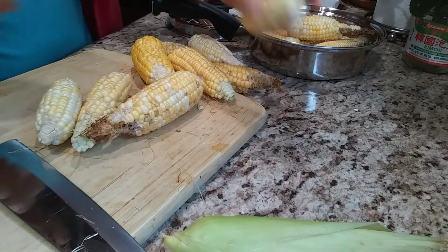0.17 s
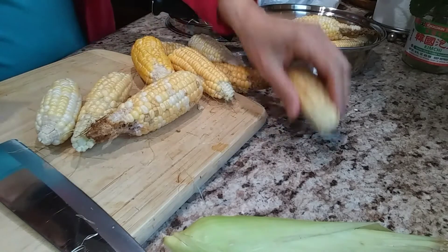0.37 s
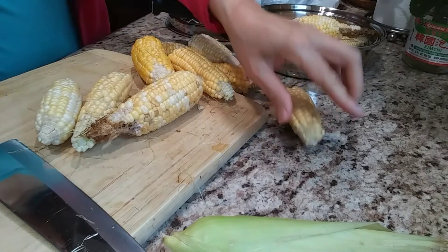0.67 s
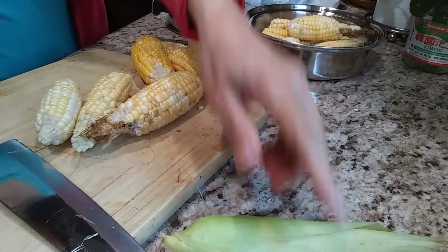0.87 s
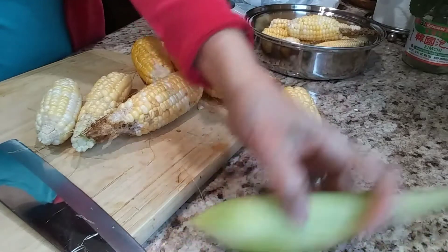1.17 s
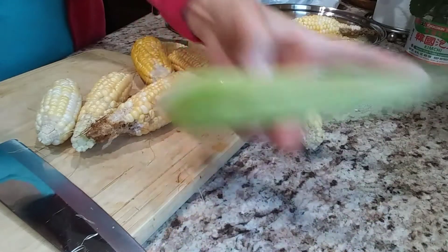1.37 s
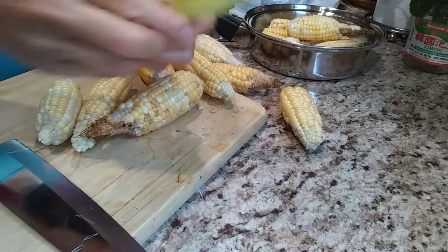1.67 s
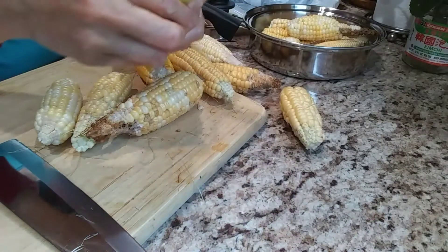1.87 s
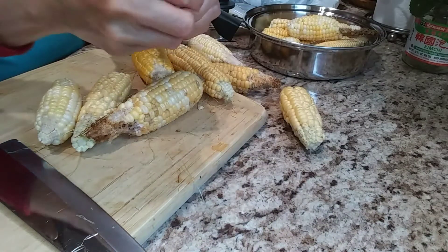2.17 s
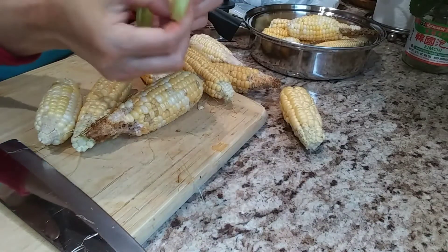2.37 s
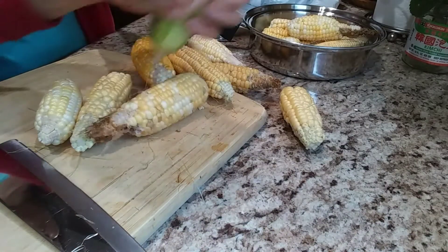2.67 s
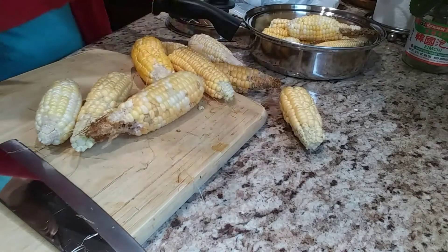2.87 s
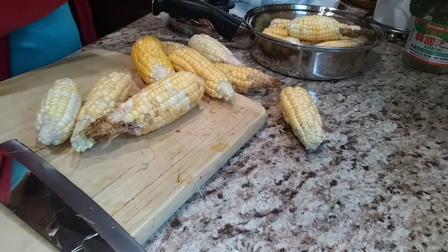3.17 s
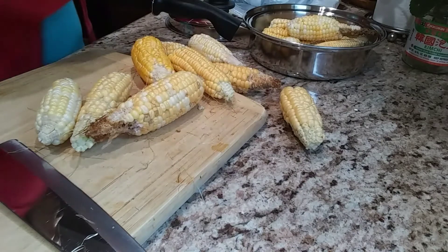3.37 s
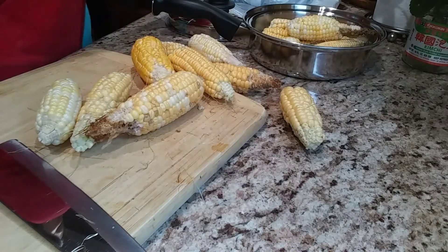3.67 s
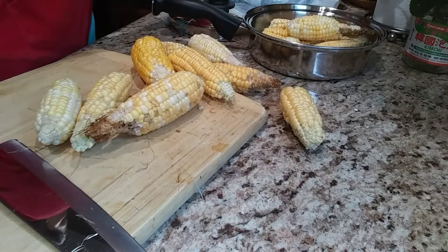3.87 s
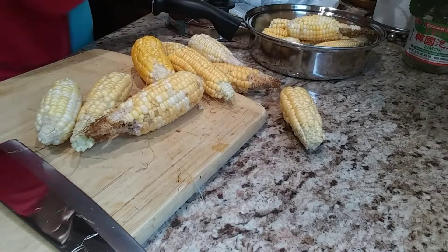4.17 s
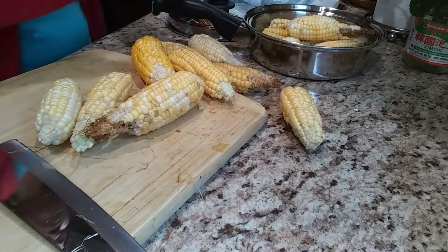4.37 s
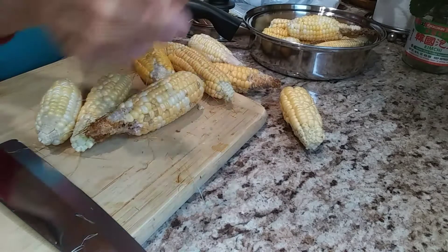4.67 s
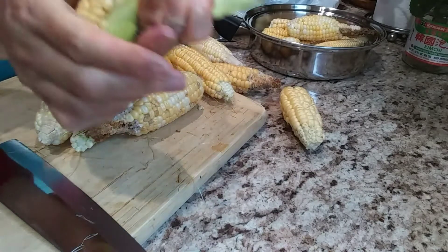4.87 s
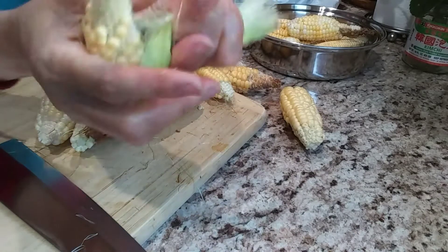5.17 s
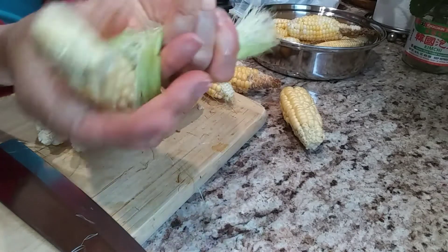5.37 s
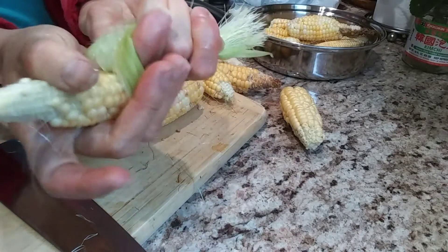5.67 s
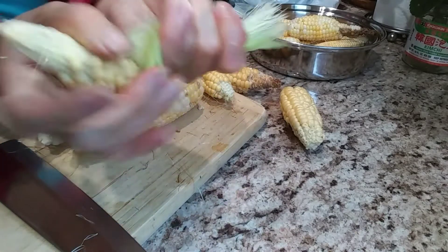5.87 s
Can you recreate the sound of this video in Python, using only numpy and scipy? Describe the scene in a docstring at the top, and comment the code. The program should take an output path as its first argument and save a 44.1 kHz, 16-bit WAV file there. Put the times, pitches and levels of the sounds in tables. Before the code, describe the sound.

An ear of fresh corn is husked by hand, close up, in a hard-walled kitchen. A small snap and a faint steel clink come first, then fingers rub over the leaves and little strips rip. The husk is torn down in swelling pulls, with crackling fibres and sharp snaps. After a lull, more pulls follow and the damp leaves creak against each other. A low rush of air lies underneath.

```python
"""An ear of fresh corn is husked by hand in a hard-walled kitchen, over a low rush of air.
First the ear is picked off a stone counter with a small snap and a faint clink of steel. From about
one second the hand rubs the leaves and small strips rip. From two seconds the leaves are torn down in
long pulls: fibres crackle and ribs snap. Around five seconds, during the last pulls, the damp leaves
creak as they stick and slip over each other."""
import sys
import numpy as np
from scipy import signal
from scipy.fft import rfft, irfft, next_fast_len
from scipy.io import wavfile
from scipy.ndimage import uniform_filter1d

SR = 44100
rng = np.random.default_rng(int(sys.argv[2]) if len(sys.argv) > 2 else 0)


def wav_out(sig):
    """Save sig, one row per channel (or a flat mono array), as 16-bit PCM at SR to the path in sys.argv[1]."""
    wavfile.write(sys.argv[1], SR, np.round(np.clip(np.atleast_2d(sig).T, -1, 1) * 32767).astype(np.int16))


N = 265305

# The tone of the hollow husk and of its bright fibres. Each row: frequency in Hz, level in dB.
HUSK_TONE = [(100, -41), (200, -28), (400, -10.5), (750, -4), (1100, -3), (1900, 1.5), (2900, 1.5),
             (4300, 3), (5600, -9), (8000, -12), (16000, -43)]
FIBRE_TONE = [(1500, -82.5), (4000, -11.5), (5500, -7.5), (7200, 3), (10000, 1), (12500, -4.5),
              (16000, -9.5)]
# Pulls on the husk, building until the leaf gives.
# Each row: start in seconds, length in seconds, final level in dB, swell in dB, brightness in dB.
HUSK_PULLS = [(1.92, 0.033, -52.5, 11, -0.5), (2.0, 0.26, -65, 12, 2), (2.12, .07, -56, 2, 0.5),
              (2.195, 0.13, -39, 11.5, 1.5), (2.38, .13, -54.5, 22.5, -0.5), (2.625, 0.28, -42, 11, 1),
              (2.935, 0.14, -33, 6, 2.5), (3.1, 0.15, -57, -2.5, -12), (3.35, 0.4, -64.5, 11, -1.5),
              (4.1, 0.285, -52, 22.5, -3), (4.5, 0.32, -50, 18, -4.5), (4.865, 0.034, -41.5, 5, -2),
              (5.0, .17, -35, 30, -3.5), (5.245, 0.082, -44, 0.5, 1.5), (5.34, 0.059, -32, 7, -13.5),
              (5.53, 0.14, -45, 0.5, -5), (5.78, .16, -68, 5, -6)]


def amp(db):
    """Turn decibels into a gain."""
    return 10 ** (np.asarray(db) / 20)


def unit(x):
    """Scale a sound to an average (rms) level of 1."""
    return x / np.sqrt(np.mean(x ** 2) + 1e-20)


def along(points, hz):
    """Read between (Hz, value) points, with every octave equally wide."""
    frequencies, values = np.transpose(points)
    return np.interp(np.log(hz + 1), np.log(frequencies), values)


def add(track, start, sound):
    """Mix a sound into a track at a start time in seconds."""
    part = track[max(0, round(start * SR)):][:len(sound)]
    part += sound[:len(part)]


def filtered(x, gain):
    """Turn each frequency up or down by gain(hz)."""
    size = next_fast_len(N + SR // 4)
    return irfft(rfft(x, size) * gain(np.fft.rfftfreq(size, 1 / SR)), size)[..., :N]


def body(x, tone, size=4096):
    """Let a sound ring through an object with this tone."""
    cepstrum = irfft(np.log(amp(along(tone, np.fft.rfftfreq(size, 1 / SR)))))
    # fold it so that the ringing comes after each hit, never before
    cepstrum[1:size // 2] *= 2
    cepstrum[size // 2 + 1:] = 0
    response = irfft(np.exp(rfft(cepstrum)))
    return signal.fftconvolve(x, response / np.linalg.norm(response))[:N]


def grains(per_s, spread_db, life_s, hiss):
    """A crackle: tiny noise bursts of uneven size at random moments, over a smooth hiss."""
    hits = rng.random(N) < per_s / SR
    energy = hits * amp(spread_db * np.clip(rng.standard_normal(N), -2, 2)) ** 2
    energy = signal.lfilter([1], [1, -np.exp(-1 / (life_s * SR))], energy)
    # the hand sets the work done per moment, however many fibres share it
    energy /= np.abs(uniform_filter1d(energy, size=1100)) + energy.mean() / 20
    return unit(np.sqrt(energy + hiss) * rng.standard_normal(N))


def strokes(rows, attack_s=0.014, release_db_per_s=244.5):
    """How strong hand strokes and their treble are over time: each takes hold, swells and lets go."""
    gain, treble = np.zeros((2, N))
    for start, length, db, swell_db, bright_db in rows:
        t = np.arange(N) / SR - start
        rise_db = swell_db * (np.clip(t / length, 0, 1) - 1)
        fall_db = release_db_per_s * np.maximum(t - length, 0)
        stroke = np.clip(t / attack_s, 0, 1) * amp(db + rise_db - fall_db)
        gain += stroke
        treble += amp(bright_db) * stroke
    return gain, treble


def leaf_ring(t, hz, cycles):
    """A flicked leaf swings a few times; its speed makes the sound."""
    swing = np.sin(2 * np.pi * hz * t) * np.exp(-t * hz / cycles) * (1 - np.exp(-2 * t * hz))
    speed = np.gradient(swing)
    return speed / np.abs(speed).max()


def room_noise(level_db=-59):
    """A steady low rush of air in the room."""
    # The tone of the air. Each row: frequency in Hz, level in dB.
    air_tone = [(15, -70), (25, -37.5), (92, -33.5), (149, -10.5), (263, -9.5), (326, -3.5), (489, -8),
                (575, -4.5), (1070, -9), (1330, -13), (1440, -14), (2480, -20), (7920, -34), (14800, -29),
                (16000, -49)]
    air = filtered(rng.standard_normal(N), lambda hz: amp(along(air_tone, hz)))
    return amp(level_db) * unit(air)


def steel_clink(bright_db=-2, ring_db=3, life_s=0.075):
    """Lightly touched steel rings briefly in a wash of room sound."""
    # Touches on kitchenware. Each row: start in seconds, level in dB.
    touches = [(0.084, -54.5)]
    # The notes of the steel. Each row: frequency in Hz, level in dB.
    steel_notes = [(3130, -11), (3850, -14), (4450, -11), (6830, -14), (7740, -16)]
    t = np.arange(SR // 2) / SR
    chord = sum(amp(db) * np.sin(2 * np.pi * hz * t) for hz, db in steel_notes)
    wash, rings = np.zeros((2, N))
    for start, db in touches:
        fade = amp(db - 7) * np.exp(-t / life_s)
        add(wash, start, fade * rng.standard_normal(len(t)))
        add(rings, start, fade * chord)
    return body(wash, HUSK_TONE) + amp(bright_db) * body(wash, FIBRE_TONE) + amp(ring_db) * rings


def rib_snaps(cycles=2.15, crack_s=0.0006, splinter_s=0.0064, fizz_db=-4):
    """Each leaf rib cracks, rings for a few swings and sheds splinters."""
    # Ribs breaking. Each row: start in seconds, level in dB, pitch in Hz,
    # then the dB added to that level for the crack and for the splinters.
    ribs = [(.084, -40.5, 4000, -3, -26), (.597, -44, 3750, -3, -23), (.987, -37, 3220, 8.5, -7),
            (1.061, -31, 2500, -20, -22), (1.346, -29, 6400, 5, -16), (1.635, -31.5, 1690, 9, -13),
            (1.952, -26.5, 2120, -1.5, -14), (2.045, -34, 10300, -1, -32), (2.121, -29, 4100, -9, -8),
            (2.216, -26, 6800, -9, -16), (2.239, -22, 7030, 0, -34), (2.245, -15, 6960, -2, -27.5),
            (2.274, -13, 6800, -9, -28), (2.3094, -14, 3840, -4.5, -14.5), (2.3265, -19, 4000, -9, -16),
            (2.774, -12, 2560, -7.5, -32.5), (2.842, -14.5, 10200, -3.5, -21.5),
            (3.0105, -10, 5000, 0, -27), (3.0294, -9.5, 2840, -10.5, -24), (3.0461, -5, 4460, -20, -37.5),
            (3.0961, -7, 7270, 0.5, -24.5), (4.223, -33.5, 7250, -7, -23), (4.314, -27.5, 2740, 4, -12),
            (4.36, -24.5, 2200, -12, -17), (4.3726, -20.5, 1870, -8.5, -22), (4.561, -27.5, 3320, 0, -16.5),
            (4.695, -27, 4640, 0.5, -12), (4.742, -19.5, 1790, -5.5, -12.5), (4.81, -27.5, 3770, -4, -22),
            (4.8833, -19.5, 2060, 2.5, -20.5), (4.906, -18, 3200, 3, -22), (5.048, -28.5, 3600, -13, -30),
            (5.072, -24.5, 3520, -4, -19.5), (5.114, -24, 3200, -4.5, -13), (5.1465, -8.5, 4080, -8, -17.5),
            (5.248, -18.5, 3700, -12, -19.5), (5.292, -14.5, 10600, -4.5, -24),
            (5.3684, -8.5, 4470, -0.5, -22.5), (5.5744, -17, 1970, 3.5, -31), (5.6667, -24, 4400, -8, -19),
            (5.711, -26, 3940, -12, -17.5), (5.879, -29.5, 3340, -8, -13.5), (5.94, -27, 4870, -4.5, -16)]
    t = np.arange(SR // 40) / SR
    rings, cracks, splinters = np.zeros((3, N))
    for start, db, hz, crack_db, splinter_db in ribs + thin_ribs():
        crack = rng.choice([-1, 1], len(t)) * np.exp(-t / crack_s)
        splinter = rng.standard_normal(len(t)) * np.exp(-t / splinter_s)
        add(rings, start, amp(db - 5.5) * leaf_ring(t, hz, cycles))
        add(cracks, start, amp(db + crack_db + 4.5) * crack / np.linalg.norm(crack))
        add(splinters, start, amp(db + splinter_db) * splinter)
    return rings + body(cracks + amp(fizz_db) * splinters, FIBRE_TONE) + body(splinters, HUSK_TONE)


def hand_rubbing(grip_db=-53.5, firm_pull_db=-41):
    """Skin slides over ribbed leaves; the harder the hands work, the more the cob shifts dully."""
    # The hand sliding on the ear.
    # Each row: start in seconds, length in seconds, final level in dB, swell in dB, brightness in dB.
    rubs = [(.92, 0.3, -48.5, 8.5, -2.5), (1.25, 0.12, -54.5, 3.5, 3), (1.51, 0.091, -50.5, 5, -1.5),
            (1.67, 0.16, -68, 1, 3.5)]
    # The tone of the palm and of the cob. Each row: frequency in Hz, level in dB.
    palm_tone = [(100, -19), (300, -17), (600, -5.5), (1100, 1.5), (2000, 2.5), (3500, 3), (5300, -4),
                 (8000, -2), (16000, -37)]
    cob_tone = [(40, -38), (100, -24.5), (160, -11.5), (320, 0.5), (650, -2.5), (1000, -8), (2000, -32.5)]
    rub, treble = strokes(rubs)
    pull, _ = strokes(HUSK_PULLS)
    slide = grains(per_s=3300, spread_db=10.5, life_s=0.00067, hiss=0.92)
    effort = (rub + pull) / amp(firm_pull_db)
    shift = amp(grip_db) * np.sqrt(effort) * grains(per_s=100, spread_db=7.5, life_s=0.0017, hiss=0.76)
    return body(rub * slide, palm_tone) + body(treble * slide, FIBRE_TONE) + body(shift, cob_tone)


def leaf_rips(husk_db=-3, ring_db=-4, fizz_db=1, sharpness=8):
    """A run of fibres parts in one dense burst that swells and stops, ringing the freed strip."""
    # Strips of leaf giving way at once.
    # Each row: start in seconds, length in seconds, level in dB, brightness in dB, pitch in Hz.
    strips = [(.955, .01, -44.5, -9, 3900), (1.51, 0.01, -50.5, -0.5, 2100), (1.56, 0.011, -51.5, 2, 2980),
              (1.631, .008, -44, -5, 4960), (1.949, .008, -41.5, -9, 1410), (2.258, 0.015, -35, 1.5, 4540),
              (2.3, 0.018, -29.5, -9, 3700), (2.766, 0.017, -35.5, -16, 2350),
              (2.945, 0.033, -31.5, -19, 2600), (2.99, 0.037, -33, -2, 3800), (3.025, 0.032, -34, 5.5, 687),
              (3.707, .014, -53, -5.5, 1560), (5.129, 0.03, -22.5, -13, 2060),
              (5.131, 0.024, -29.5, -10, 1030), (5.532, 0.0064, -35.5, 6.5, 4380),
              (5.662, 0.0093, -42, 8.5, 4400)]
    t = np.arange(SR // 20) / SR
    bursts, fizz, rings = np.zeros((3, N))
    breaks = grains(per_s=900, spread_db=3.5, life_s=0.00055, hiss=0.95)
    for k, (start, length, db, bright_db, hz) in enumerate(strips):
        swell = np.sqrt(np.abs(np.sin(np.pi * np.minimum(t / length, 1))))
        burst = amp(db) * swell * breaks[k * len(t):][:len(t)]
        ring = signal.lfilter(*signal.iirpeak(hz, sharpness, SR), burst)
        add(bursts, start, burst)
        add(fizz, start, amp(bright_db) * burst)
        add(rings, start, ring * np.linalg.norm(burst) / np.linalg.norm(ring))
    husk = amp(husk_db) * body(bursts, HUSK_TONE)
    return husk + amp(ring_db) * rings + amp(fizz_db) * body(fizz, FIBRE_TONE)


def husk_tearing():
    """Breaking fibres shake the hollow husk and give off a bright fizz of their own."""
    pull, treble = strokes(HUSK_PULLS)
    fibres = grains(per_s=560, spread_db=3.6, life_s=0.0006, hiss=0.26)
    return body(pull * fibres, HUSK_TONE) + body(treble * fibres, FIBRE_TONE)


def thin_ribs(per_s=35, over_pull_db=13, scatter_db=3.5, hz=3780, crack_db=3.5, splinter_db=-10):
    """More rows for rib_snaps: thin ribs break at random, louder when the pull is stronger."""
    pull, _ = strokes(HUSK_PULLS)
    starts = np.cumsum(rng.exponential(1, 400)) / per_s
    chance = np.clip(rng.standard_normal((len(starts), 2)), -2, 2)
    rows = []
    for start, (size, pitch) in zip(starts, chance):
        if start < N / SR:
            db = 20 * np.log10(pull[int(start * SR)] + 1e-9) + over_pull_db + scatter_db * size
            rows.append((start, db, hz * np.exp(0.49 * pitch), crack_db, splinter_db))
    return rows


def slips(slide, jitter=0.12, scatter_db=0.1):
    """The time, size and pitch of each slip in a creak: they weaken and rise as the leaf slides off."""
    start, length, db, fade_db, per_s, first_hz, last_hz = slide
    timing, level, pitch = rng.standard_normal((128, 3))[:int(length * per_s)].T
    progress = (np.arange(len(timing)) + jitter * timing) / (length * per_s)
    size = amp(db - fade_db * progress + scatter_db * level) * np.sqrt(SR / per_s)
    hz = (first_hz + (last_hz - first_hz) * progress) * np.exp(jitter * pitch)
    return zip(start + length * progress, size, hz)


def leaf_creaks(flick_db=-5, scrape_db=-5, scrape_s=0.0022, ring_db=-3):
    """Damp leaves stick and slip: each slip flicks the leaf, and its short scrape rings the tight husk."""
    # Leaf sliding on leaf. Each row: start in seconds, length in seconds, first level in dB,
    # fade in dB, slips per second, first pitch in Hz, last pitch in Hz.
    slides = [(4.883, 0.055, -36.5, 3.9, 200.4, 2600, 2950), (5.374, 0.21, -29, 12.3, 204.5, 2500, 4830),
              (5.566, .06, -29.5, 2.2, 220.1, 3230, 3630)]
    # The tone of a scraped leaf. Each row: frequency in Hz, level in dB.
    leaf_tone = [(150, -36), (500, -20.5), (1000, -14), (1500, -4), (2200, -0.5), (2900, 1), (3550, 2.5),
                 (4400, -3), (5500, -9), (7000, -3.5), (9000, -15), (11000, -6), (13000, -26),
                 (16000, -18.5)]
    # The notes of the tight leaf round the cob. Each row: frequency in Hz, width in Hz, level in dB.
    leaf_notes = [(2310, 210, -20), (3540, 70, -7), (4210, 116, -8), (4670, 93, -11), (6370, 700, -12.5)]
    t = np.arange(SR // 100) / SR
    flicks, scrapes = np.zeros((2, N))
    for slide in slides:
        for start, size, hz in slips(slide):
            flick = leaf_ring(t, hz, cycles=2)
            scrape = rng.choice([-1, 1], len(t)) * np.exp(-t / scrape_s)
            add(flicks, start, size * flick / np.linalg.norm(flick))
            add(scrapes, start, size * scrape / np.linalg.norm(scrape))
    chord = np.zeros(len(t))
    for hz, width, db in leaf_notes:
        fade = np.sqrt(4 * np.pi * width / SR) * np.exp(-np.pi * width * t)
        chord += amp(db) * fade * np.cos(2 * np.pi * hz * t)
    chord[0] /= 2  # half a step at the start keeps the ring free of bass
    rings = signal.fftconvolve(scrapes, chord)[:N]
    return amp(flick_db) * flicks + amp(scrape_db) * body(scrapes, leaf_tone) + amp(ring_db) * rings


def kitchen_echo(x, near_db=-9, tail_db=-13, count=9):
    """Counter, board and pot bounce the sound back at once; the walls follow with a smooth tail."""
    # How long the kitchen rings. Each row: frequency in Hz, seconds to fade by 60 dB.
    fade_times = [(200, 0.94), (1000, 0.55), (3000, 0.6), (6000, 0.58), (10000, 0.4), (16000, 0.28)]
    hz, t, noise = signal.stft(rng.standard_normal(SR * 3 // 4), SR, nperseg=256)
    fade = amp(-60 * t / along(fade_times, hz)[:, None])
    _, tail = signal.istft(noise * fade, SR, nperseg=256)
    tail *= 1 - np.exp(-np.arange(len(tail)) / SR / 0.003)
    near = np.zeros(len(tail))
    delays_s = rng.uniform(0.001178, 0.012, count)
    near[(delays_s * SR).astype(int)] = rng.choice([-1, 1], count) / np.sqrt(delays_s)
    echo = amp(near_db) * near / np.linalg.norm(near) + amp(tail_db) * tail / np.linalg.norm(tail)
    return signal.fftconvolve(x, echo)[:N]


def scene():
    """Everything sits in the middle; only a faint high hiss differs between left and right."""
    # The stereo width. Each row: frequency in Hz, gain of the side hiss in dB.
    width = [(2500, -72.5), (4000, -51.5), (5000, -18.5), (8000, -22), (11000, -12.5), (14000, -9.5)]
    husking = husk_tearing() + leaf_rips() + rib_snaps() + leaf_creaks()
    hands = hand_rubbing()
    husking += kitchen_echo(husking)
    hands += kitchen_echo(hands)
    middle = husking + hands + steel_clink() + room_noise()
    # a faint high hiss, opposite in left and right, rises and falls with the husking's treble
    treble = filtered(husking, lambda hz: hz > 7000)
    loudness = np.sqrt(np.abs(uniform_filter1d(treble ** 2, size=512)))
    side = filtered(loudness * rng.standard_normal(N), lambda hz: amp(along(width, hz)))
    return np.array([middle + side, middle - side])


def record(dry):
    """Cut away everything above 16000 Hz."""
    return filtered(dry, lambda hz: hz < 16000)


dry = scene()
out = record(dry)
wav_out(out)
```